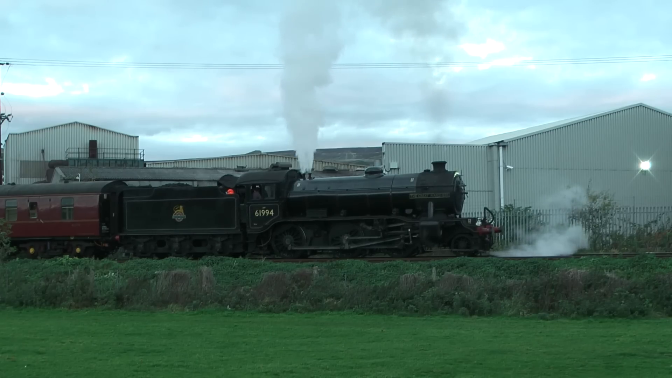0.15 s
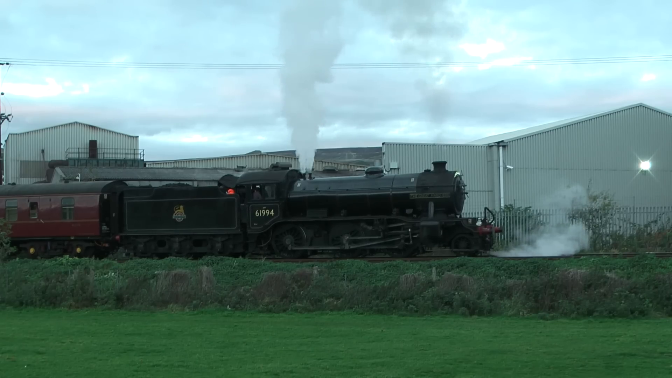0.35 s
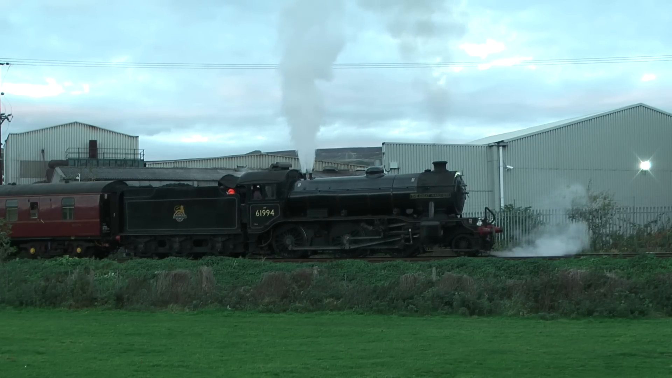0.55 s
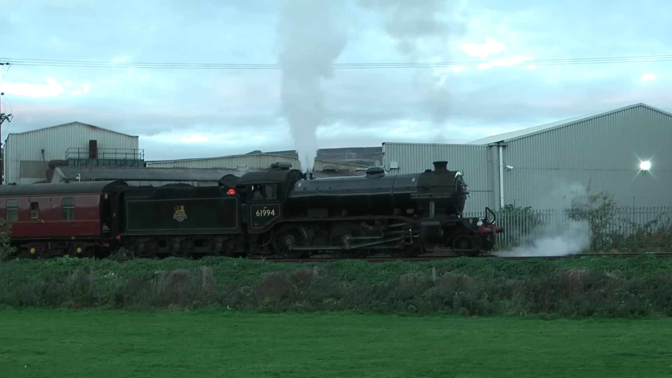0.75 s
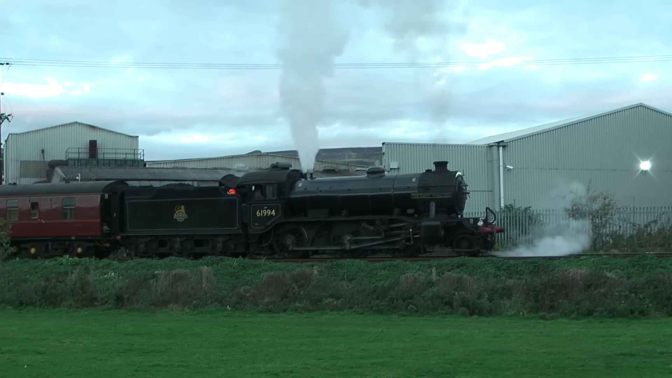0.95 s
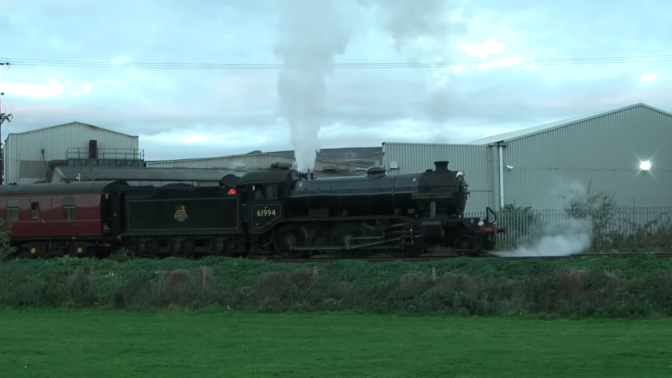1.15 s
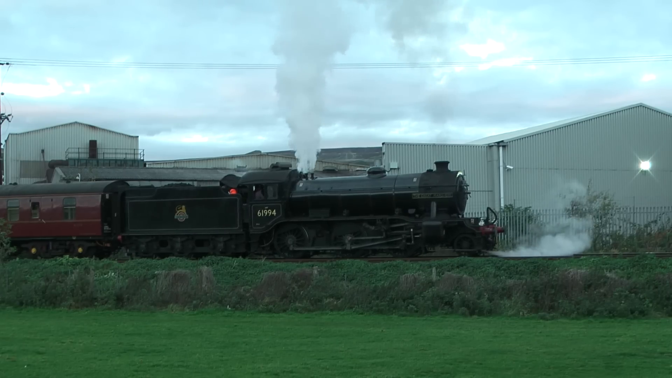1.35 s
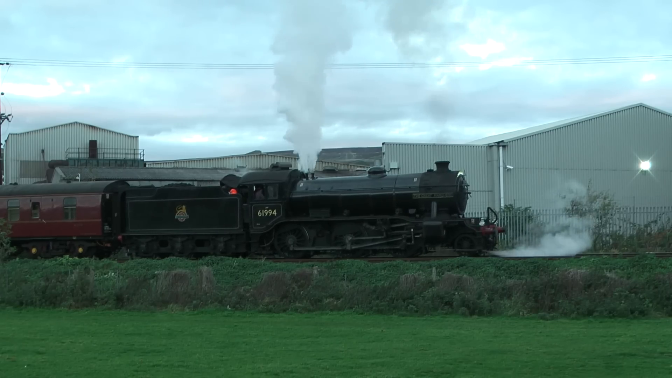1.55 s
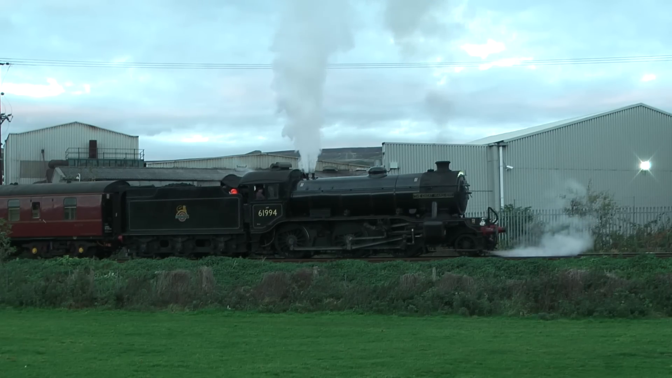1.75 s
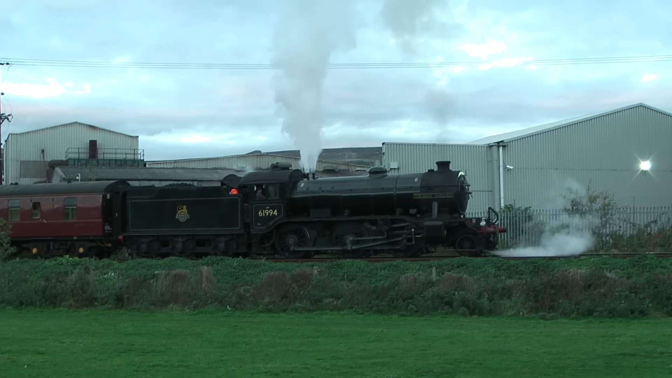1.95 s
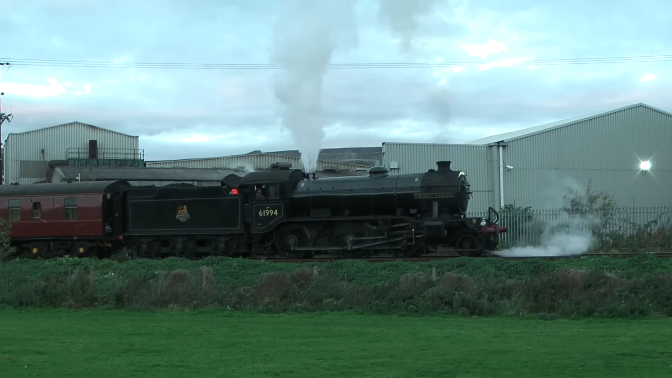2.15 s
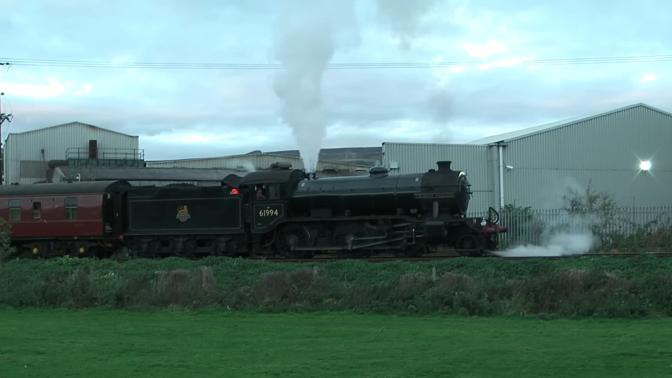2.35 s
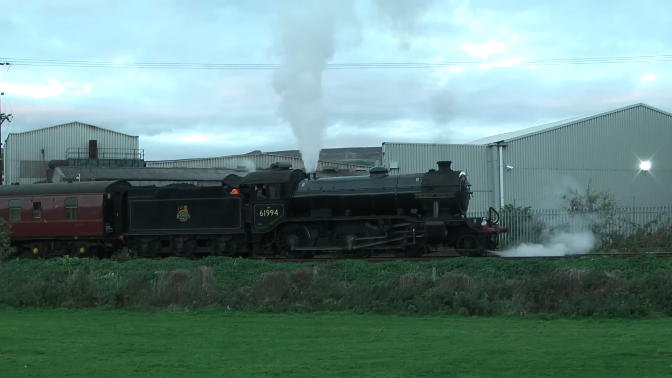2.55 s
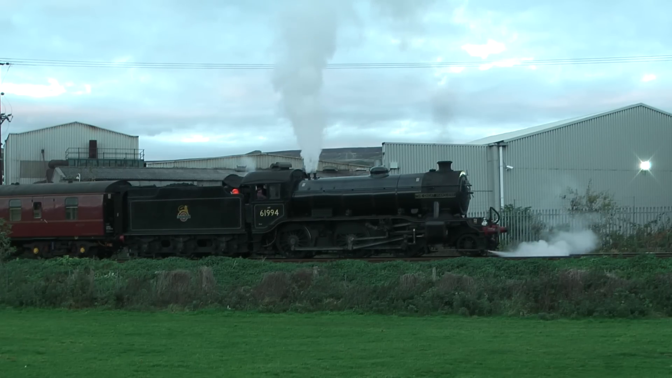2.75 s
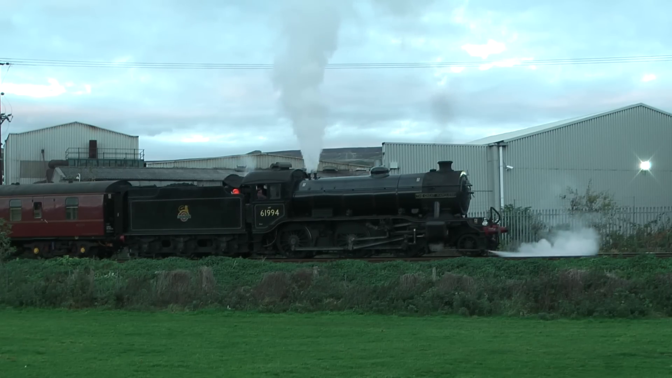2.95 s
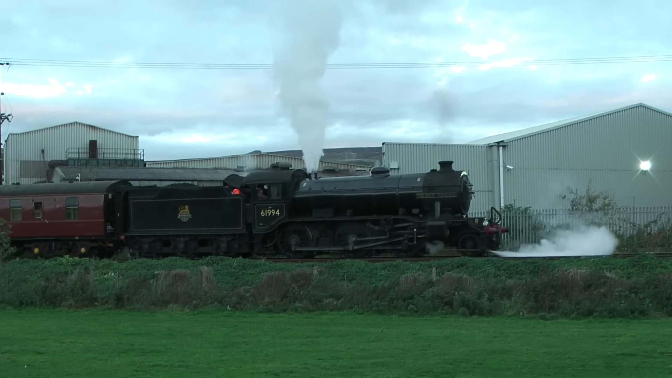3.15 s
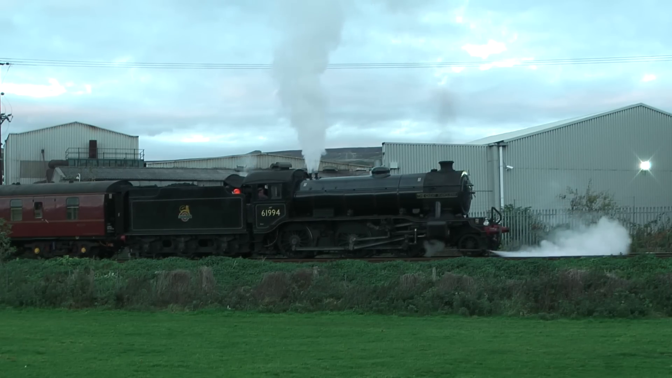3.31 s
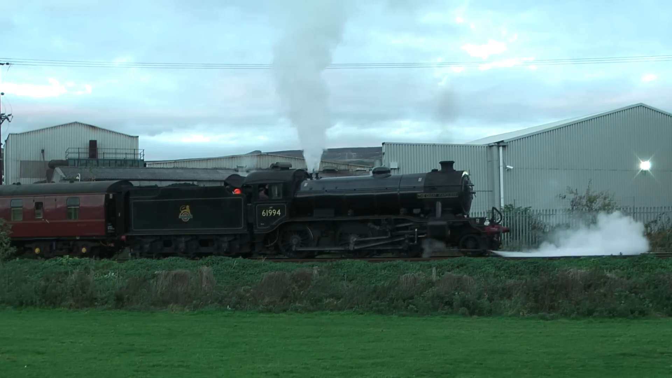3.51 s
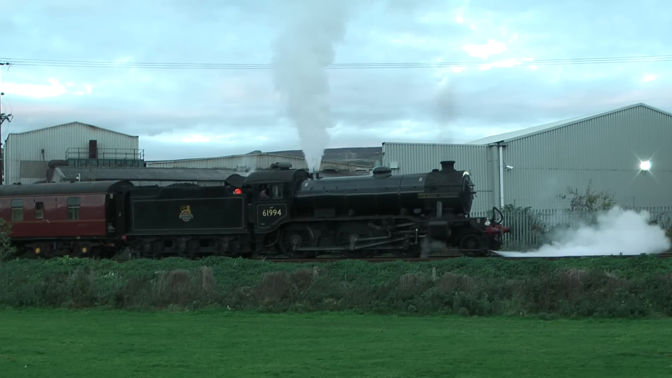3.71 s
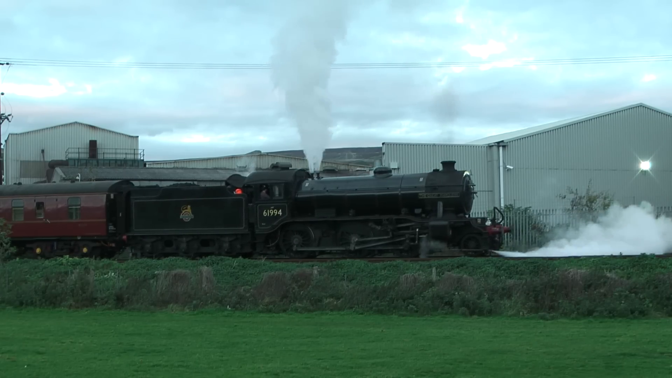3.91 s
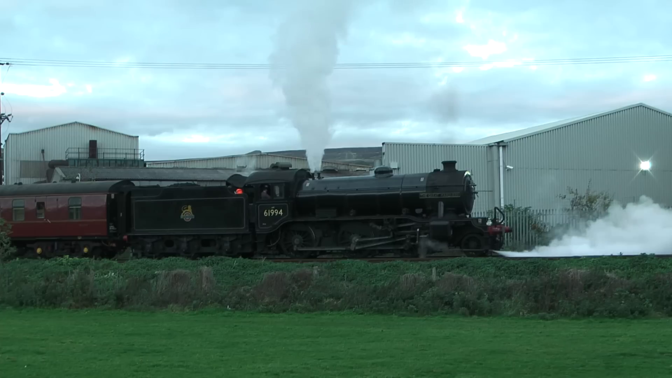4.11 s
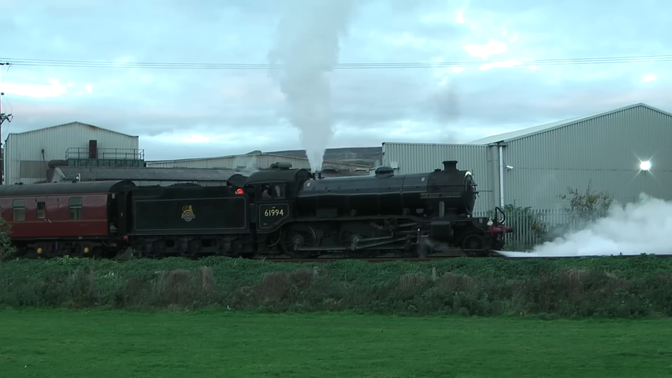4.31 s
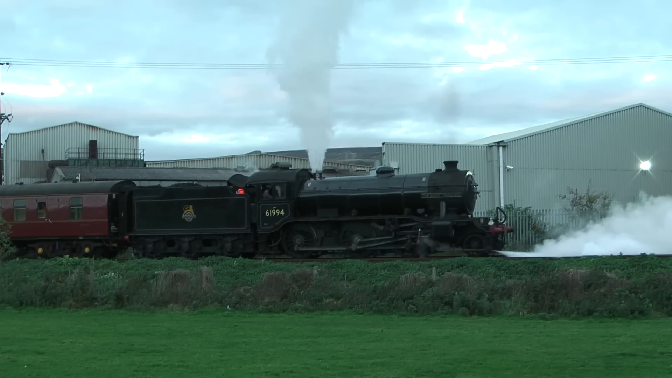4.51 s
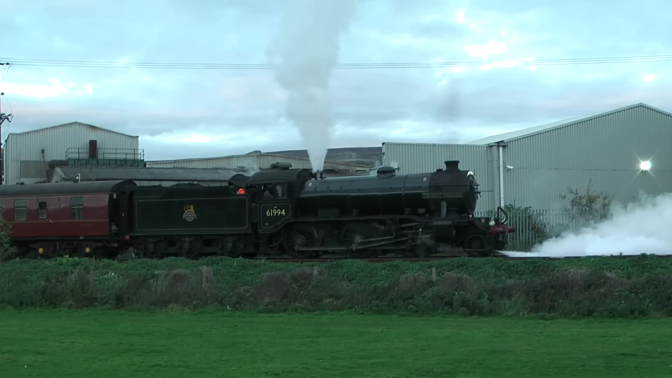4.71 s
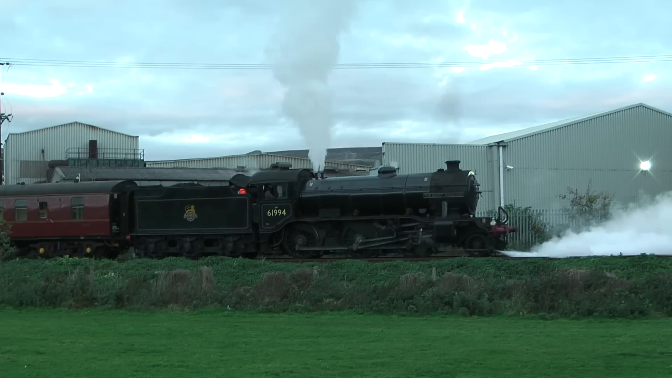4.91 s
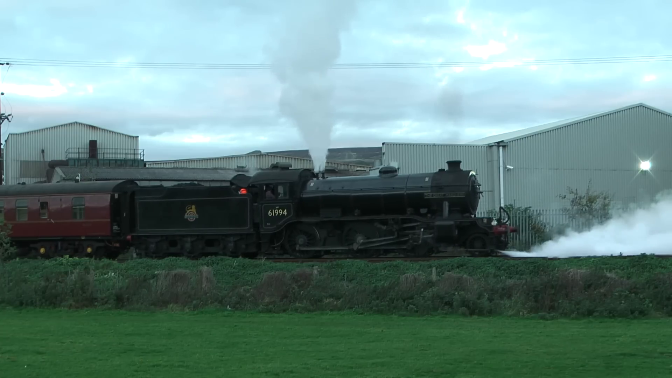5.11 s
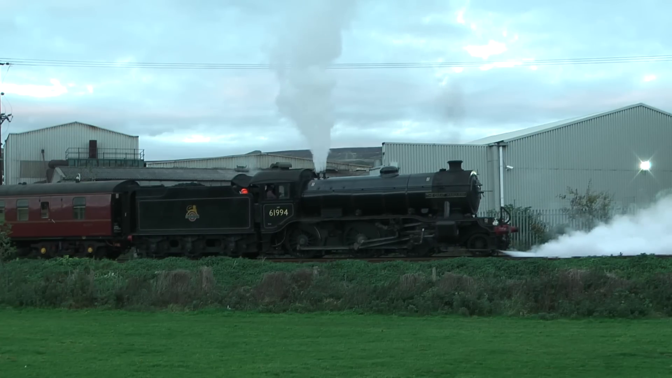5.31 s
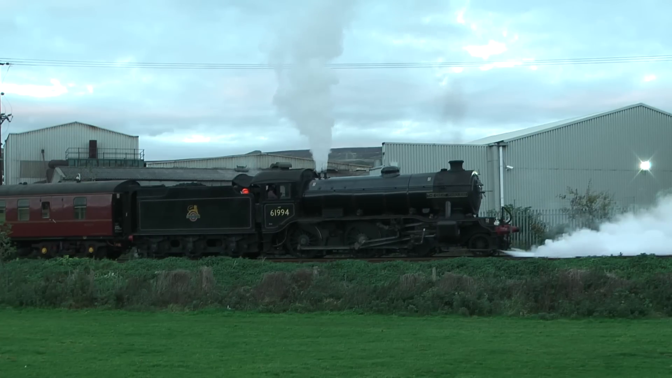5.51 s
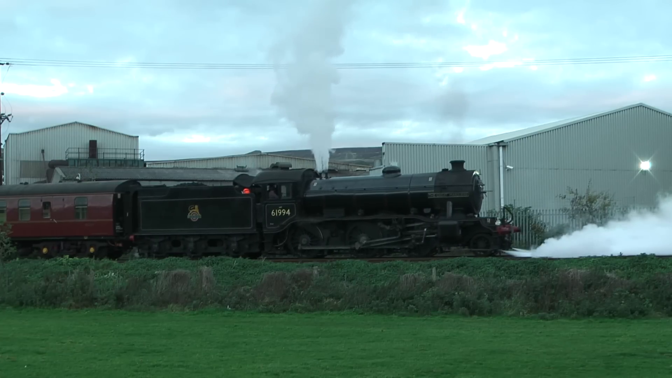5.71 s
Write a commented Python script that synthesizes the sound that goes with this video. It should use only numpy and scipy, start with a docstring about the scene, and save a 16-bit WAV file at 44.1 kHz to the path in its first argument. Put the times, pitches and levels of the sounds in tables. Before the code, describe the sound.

A standing steam engine hisses softly, toots once, briefly, echoing off sheds, then releases a growing, roaring gush of wet steam.

```python
"""Steam blows off steadily, a whistle gives one short toot with echoes, then a growing rush of steam begins.
A steam locomotive stands across a meadow before a row of sheds. Valve and rush are shaped noise; the toot
is a gliding stack of sine tones over hiss. Valve and whistle are heard twice, direct and off the grass.
The sheds return delayed copies of the toot and a dense tail. The end of an earlier blow and earlier
echoes, a far rumble and a thin high tone lie underneath."""
import sys
import numpy as np
from scipy import signal
from scipy.fft import rfft, irfft, next_fast_len
from scipy.io import wavfile
from scipy.ndimage import uniform_filter1d, map_coordinates

SR = 44100
rng = np.random.default_rng(int(sys.argv[2]) if len(sys.argv) > 2 else 0)


def dump(signal):
    """Clip the signal to [-1, 1] and save it as 16-bit WAV at the path in sys.argv[1]."""
    limited = np.clip(np.atleast_2d(signal).T, -1, 1)
    pcm = np.round(limited * 32767).astype(np.int16)
    wavfile.write(sys.argv[1], SR, pcm)


N = 258867
TIME = np.arange(N) / SR  # seconds

# The path of the toot: (time [s], central pitch [Hz], relative level [dB])
TOOT = [(1.241, 1020, -50), (1.249, 1036, -16), (1.262, 1045, -13), (1.277, 1106, -11),
        (1.286, 1131, -10.5), (1.298, 1148, -10.5), (1.322, 1140, -10.5), (1.338, 1100, -13),
        (1.344, 1050, -28), (1.364, 760, -43)]
FULL_NOTE_HZ = TOOT[5][1]


def amp(db):
    """Turn decibels into a plain gain."""
    return 10 ** (np.asarray(db) / 20)


def unit(x):
    """Scale a signal to an rms of 1."""
    return x / np.sqrt(np.mean(x ** 2) + 1e-20)


def along(points, hz):
    """Read a (frequency, value) table at any frequency, on a log axis."""
    f, v = np.transpose(points)
    return np.interp(np.log(hz + 1), np.log(f + 1), v)


def curves(rows):
    """Give one value per sample for each column after the time."""
    s, *columns = np.transpose(rows)
    return [np.interp(TIME, s, column) for column in columns]


def wobble(rate):
    """A smooth random curve with this many random points a second."""
    points = rng.standard_normal(int(N * rate / SR) + 4)
    return map_coordinates(points, [np.arange(N) * rate / SR])


def filtered(x, response):
    """Multiply the spectrum of x by a complex response of frequency."""
    m = next_fast_len(N + 8192)
    hz = np.fft.rfftfreq(m, 1 / SR)
    return irfft(rfft(x, m) * response(hz), m)[..., :N]


def hiss(spectrum, patchy_db):
    """Turbulent noise: stereo, rms 1, with a given spectrum and patches of random gain."""
    # How alike the two channels are: (frequency [Hz], likeness [0 to 1])
    alike = [(25, .75), (60, .93), (130, .99), (800, .95), (2000, .9), (4500, .85), (7000, .87),
             (9000, .79), (10200, .66), (11000, .91), (13000, .96), (15000, .97)]
    z = signal.stft(rng.standard_normal((2, N)), nperseg=512)[2]
    patches = uniform_filter1d(rng.standard_normal(z.shape[1:]), size=6, axis=0)
    patches = uniform_filter1d(patches, size=10, axis=1)
    pair = signal.istft(z * amp(patchy_db * unit(patches)), nperseg=512)[1][:, :N]
    closed = [(10, -120)] + list(spectrum) + [(20000, -120)]  # fades out beyond both ends

    def mid_side_gain(hz):
        turn = np.arccos(np.clip(along(alike, hz), -1, 1)) / 2
        return amp(along(closed, hz)) * [np.cos(turn), np.sin(turn)]

    mid, side = filtered(pair, mid_side_gain)
    return unit(np.array([mid + side, mid - side]))


def grass(x, delay_ms, db, turn, blur_hz):
    """Add a later copy off soft ground, turned in phase (radians) and weaker in the treble."""
    def copy(hz):
        strength = amp(db) / (1 + (hz / blur_hz) ** 2)
        return strength * np.exp(1j * turn - 2j * np.pi * hz * delay_ms / 1000)

    return filtered(x, lambda hz: 1 + copy(hz))


def drain_cocks():
    """Wet steam at rail level: low eddies, a drying rush and a spitting fizz that grow as pressure builds."""
    # Noise spectra, all (frequency [Hz], relative level [dB per Hz]): low eddies, then the dry rush,
    # the rush while the steam is wet, the treble fizz, and the last of an earlier blow
    roar_shape = [(25, -39), (70, -5), (145, 5), (190, 2), (250, -10.5), (380, -15), (600, -79)]
    dry_shape = [(250, -18), (380, -25), (700, -11), (1300, -6), (1800, -5), (2300, 0), (3200, -1.5),
                 (4300, -0.5), (4800, 1.5), (5300, -2.5), (6000, -2.5), (7000, -3), (9000, -17),
                 (10000, -18)]
    wet_shape = [(250, -18.5), (380, -28), (700, -10), (1000, -7.5), (1400, -2.5), (1850, -6.5),
                 (2300, -0.5), (3200, -2.5), (4300, -0.5), (4750, 1.5), (5300, -7), (6000, -2), (6600, -10),
                 (7200, -5), (10000, -25)]
    fizz_shape = [(6500, -30), (8500, -1), (9600, -4), (10250, -7), (11200, 0), (12200, -1), (13500, -4.5),
                  (15600, -12)]
    fading_shape = [(120, -8), (300, -3), (900, -3), (1600, -3), (3000, -9), (4400, -4), (6500, -12),
                    (10000, -24)]
    open_s, opening_s = 2.69, .27  # when the cocks start to open; time to open fully
    build_db, build_s, build_bend = 14.5, 1.338, 1.53  # starting shortfall; time constant; bend
    wet_s = 0.98  # time constant of the drying
    rush_db = -19.5  # at full pressure, before the flicker
    roar_db, roar_grows, roar_full_db = -44.5, 1.13, -2  # top; swing over the rush's; where growth stops
    fizz_db, fizz_db_per_s = -47.5, 6  # before the spit and flicker; steady climb
    spit_db, spit_s = 4, 0.4  # condensed water spits out first: extra fizz, time constant
    fading_db, fading_end_s, fading_s = -49, 0.42, 0.045  # level; middle of the fade; its softness

    since = np.clip(TIME - open_s, 0, None)
    opened = np.clip(since / opening_s, 0, 1)
    wet = np.exp(-(since / wet_s) ** 2)
    pressure_db = -build_db * np.exp(-(since / build_s) ** build_bend)
    surge, flicker = .3 * wobble(9), wobble(160)

    roar_growth_db = roar_grows * np.minimum(pressure_db - roar_full_db, 0)
    roar = amp(roar_db + roar_growth_db + 0.51 * wobble(4.4)) * hiss(roar_shape, patchy_db=1.5)

    wet_rush = np.sqrt(wet) * hiss(wet_shape, patchy_db=.4)
    dry_rush = np.sqrt(1 - wet) * hiss(dry_shape, patchy_db=.7)
    rush = amp(rush_db + pressure_db + surge + .6 * flicker) * (wet_rush + dry_rush)

    fizz_level_db = fizz_db + fizz_db_per_s * since + spit_db * np.exp(-since / spit_s)
    fizz = amp(fizz_level_db + surge + 1.1 * flicker) * hiss(fizz_shape, patchy_db=-0.7)

    fade = 1 / (1 + np.exp((TIME - fading_end_s) / fading_s))
    fading = amp(fading_db) * fade * hiss(fading_shape, patchy_db=1.5)
    return opened * (roar + rush + fizz) + fading


def whistle():
    """One bell over the hiss of its jet; gives the sound near the listener, to the walls and to the yard."""
    # Harmonics of the bell: (multiple of the pitch, relative level [dB])
    overtones = [(1, -2.5), (2, -23.5), (3, -19), (4, -18), (5, -30.5), (6, -40), (7, -45), (8, -46)]
    # Steam on the whistle lip: (frequency [Hz], relative level [dB per Hz])
    breath = [(150, -6), (350, 1), (1000, 2), (2000, -1), (3000, 1), (5000, 2.5), (7000, -9), (11000, -11),
              (15500, -15)]
    full_hz, thin_hz, thin_db = 1137, 1104, -16  # full tone to the walls above the first, less below the second
    fall_db = 8.5  # the dying glide fills the yard more than it reaches the listener
    times = [row[0] for row in TOOT]

    pitch_hz, level_db = curves(TOOT)
    phase = 2 * np.pi * np.cumsum(pitch_hz + 3 * wobble(150)) / SR
    slack = np.clip((pitch_hz.max() - pitch_hz) / 100, 0, 1)  # low pressure, judged from the pitch
    closing = np.clip((TIME - times[5]) / (times[7] - times[5]), 0, 1)  # as the valve shuts
    tone = 0
    for k, db in overtones:
        shrill_db = 3.5 * (k > 1) * slack
        start_db = 5 * (k == 2) * slack * (TIME < times[2])
        closing_db = 4 * (k == 3) * closing
        flicker_db = .3 * (k - 1) * wobble(90)
        tone = tone + amp(db + shrill_db + start_db + closing_db + flicker_db) * np.sin(k * phase)
    tone = tone * np.sqrt(2)

    spurt = 1 + 5 * np.exp(-np.abs(TIME - times[1]) / .014)  # condensed water is blown out first
    lip = amp(-28.5) * spurt * hiss(breath, patchy_db=2.5)[0]
    gate = amp(level_db) * ((TIME > times[0]) & (TIME < times[-1]))
    near = grass(gate * (tone + lip), delay_ms=2.25, db=-3, turn=1.7, blur_hz=14000)
    near = near * amp([[.6], [-.6]])  # a little to the left

    carried = amp(np.interp(pitch_hz, [thin_hz, full_hz], [thin_db, 0]))
    to_walls = gate * (amp(-7) * lip + carried * tone)
    falling = amp(fall_db * (TIME > times[-3]))
    to_yard = gate * (lip + amp(-4 * slack) * falling * tone)
    return near, to_walls, to_yard


def wall_copies(to_walls, cladding):
    """Each hard surface returns a delayed copy with its own level, side and tone colour."""
    # Small hard things by the track first, then shed walls: (delay [s], relative level [dB],
    # left-right difference [dB], tilt above the note [dB per octave], extra around twice the note [dB])
    walls = [(.058, -18.5, 0.5, 5, -6), (.09, -20, -1, 3.5, 2), (.12, -28, -7, 9.5, 2),
             (.159, -5, -5.5, -4.5, -4.5), (.195, -19, -5, 2, 3.5), (.23, -4, -1, -7, 5.5),
             (.268, -10, -2.5, -9.5, 7.5), (.335, -18.5, -6, -3, 2.5), (.378, -20.5, 4.5, -7, 6),
             (.44, -28.5, 3, -2.5, 4), (.49, -25.5, 3, -4, 2), (.54, -30.5, 4, -1.5, 2.5),
             (.598, -28.5, 0, -1, -2), (.65, -33, -1, 2, -4), (.7, -35, 0, 2, -2), (.755, -38, 1, -1, -4),
             (.81, -35, -1, -1.5, -4), (.88, -38, 1, 0, -4), (0.961, -30, -1, -4, -6),
             (1.01, -37, -1, 1.5, -6), (1.08, -40, 1, -2, -4), (1.14, -40, 1, -3, -4),
             (1.21, -39, 2, -3, -4), (1.28, -40.5, 2, -3, -4), (1.35, -42, 0, -3, -4),
             (1.429, -46, 1, -3, -4), (1.5, -47, 3, -5, -4)]
    delay_s, db, pan_db, tilt_db, second_db = np.transpose(walls)[:, :, None]
    side = np.array([.5, -.5])[:, None, None]
    lag_s = delay_s + side * 0.000068  # the left channel hears the walls slightly later

    def response(hz):
        ratio = hz / FULL_NOTE_HZ
        tilt = tilt_db * np.log2(np.clip(ratio, 1, 6))
        second = second_db * np.exp(-(ratio - 2) ** 2 * 8)
        level = amp(db + side * pan_db + tilt + second)
        copies = level * np.exp(-2j * np.pi * hz * lag_s)
        return amp(along(cladding, hz)) * np.sum(copies, axis=1)

    return filtered(to_walls, response)


def yard_tail(to_yard, cladding):
    """Scattered echoes merge into a noise-like tail whose treble dies away sooner."""
    # Time to fall by 60 dB: (frequency [Hz], decay time [s])
    decay = [(500, 6.6), (1100, 2.38), (2300, 1.97), (3400, 1.26), (4600, 1.22), (10000, 0.85)]
    tail_tilt_db = 3.2  # per octave: the tail starts brighter than the cladding curve
    hz, t, z = signal.stft(rng.standard_normal((2, 3 * SR)), SR, nperseg=256)
    z[1] = .9 * z[0] + .7 * z[1]  # both channels hear much the same tail
    bright_db = tail_tilt_db * np.log2(np.clip(hz / FULL_NOTE_HZ, 1, 4))
    start_db = along(cladding, hz) + bright_db
    shape_db = start_db[:, None] - 60 * t / along(decay, hz)[:, None]
    build_up = 1 - np.exp(-t / .08)
    tail = signal.istft(z * amp(shape_db) * build_up, SR, nperseg=256)[1]
    tail = tail / np.linalg.norm(tail[0])
    return amp(-8.5) * signal.fftconvolve(to_yard[None], tail, axes=1)[:, :N]


def sheds(to_walls, to_yard):
    """Wall copies and a scattered tail answer the toot; an earlier toot is still dying away."""
    # What the walls return: (frequency [Hz], relative level [dB])
    cladding = [(500, -17), (800, 8), (960, 22.5), (1070, 8.5), (1145, 3.5), (2300, 14), (3430, 12.5),
                (4600, 7), (5700, 11), (7500, 13), (10000, 0), (15000, -33.5)]
    walls = wall_copies(to_walls, cladding)
    far = yard_tail(to_yard, cladding)
    skip = round(2.45 * SR)
    earlier = np.pad(far[:, skip:], ((0, 0), (0, skip)))
    flutter = amp(.8 * wobble(60))  # drifting steam and air make the long paths flicker
    return amp(-1) * (flutter * (walls + far) + amp(-7.0) * earlier)


def safety_valve():
    """A steady jet high on the boiler, a little to the left, coloured by its ground copy."""
    # The steam plume: (frequency [Hz], relative level [dB per Hz])
    plume = [(400, -3.5), (600, 0.5), (1270, 1), (1900, -6), (2250, 3.5), (2700, 2), (3400, 2.1),
             (4700, -5), (5600, -5), (6100, -9.5), (6800, -7.5), (7500, -15.5), (9000, -15), (10000, -20),
             (12000, -15.5), (14600, -12), (15500, -38)]
    jet = hiss(plume, patchy_db=0.8)
    jet = unit(grass(jet, delay_ms=1.43, db=-4.0, turn=-1.29, blur_hz=8000))
    drift_db = .5 * wobble(6) + .4 * wobble(1.5)
    return amp(-42.4 + drift_db + np.array([[.6], [-.6]])) * jet


def yard_rumble():
    """The far rumble of the yard: low noise with a slowly drifting level."""
    # The rumble: (frequency [Hz], relative level [dB per Hz])
    rumble = [(13, -46), (22, -11), (75, -0.5), (177, -18), (246, -17.5), (342, -32), (400, -25),
              (520, -41), (880, -120)]
    return amp(-54.5 + 0.3 * wobble(1.9)) * hiss(rumble, patchy_db=1)


def whine():
    """A thin, unsteady high sine tone, the same on both channels."""
    pitch_hz = 14142 + 18 * wobble(60)
    return amp(-74 + 2.5 * wobble(25)) * np.sin(2 * np.pi * np.cumsum(pitch_hz) / SR)


def left_right_difference(x):
    """Level and phase differ between left and right; the treble is nearly opposite in phase."""
    # Left against right: (frequency [Hz], level difference [dB])
    sides = [(60, .4), (700, .2), (1500, -.3), (2800, -.7), (4200, -1.2), (5300, -3.5), (6500, -1),
             (7700, 7.5), (9000, 7), (9900, 5), (10300, 0), (11500, 3), (13000, 1), (14500, 0)]
    # Lead of the left channel: (frequency [Hz], phase [radians])
    lead = [(0, 0), (1550, .3), (3360, .6), (4220, 1.3), (4900, 1.1), (5900, 1.9), (6890, 3.1), (8100, 2.3),
            (8960, 3.1), (9700, 2), (10600, 2.95), (14000, 3.14)]

    def response(hz):
        difference = np.log(amp(along(sides, hz))) + 1j * along(lead, hz)
        return np.exp(np.array([[.5], [-.5]]) * difference)  # half to each channel, in opposite senses

    return filtered(x, response)


def scene():
    """Set engine and yard apart in stereo, then add the echoes and the whine."""
    near, to_walls, to_yard = whistle()
    engine = drain_cocks() + near + safety_valve()
    return left_right_difference(engine + yard_rumble()) + sheds(to_walls, to_yard) + whine()


def record(dry):
    """Keep nothing at or above the band limit."""
    top_hz = 15720
    return filtered(dry, lambda hz: hz < top_hz)


dry = scene()
out = record(dry)
dump(out)
```